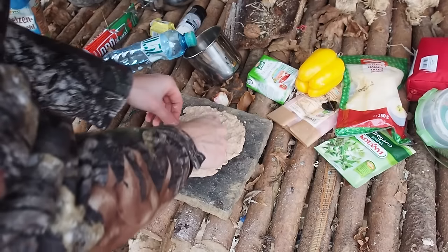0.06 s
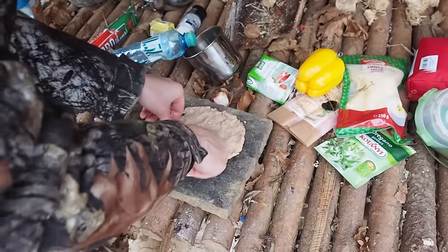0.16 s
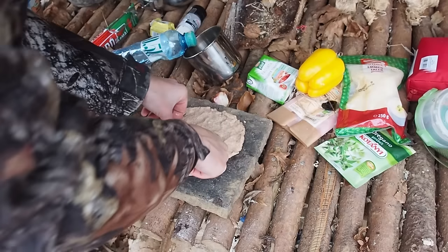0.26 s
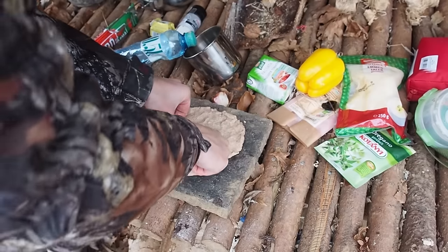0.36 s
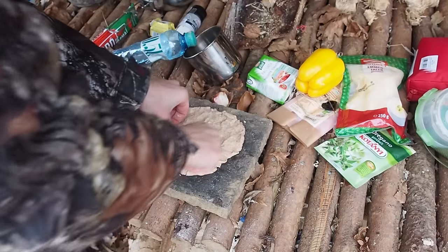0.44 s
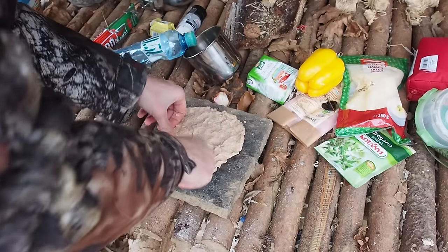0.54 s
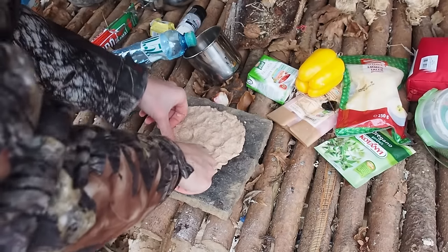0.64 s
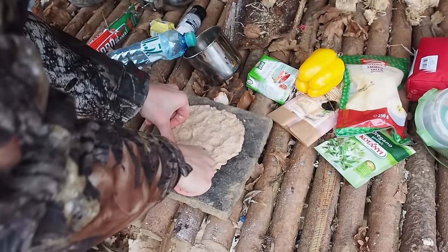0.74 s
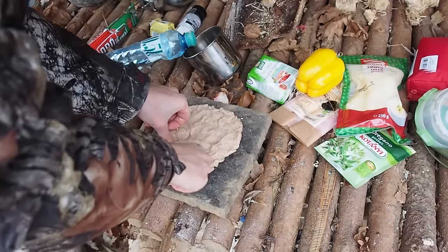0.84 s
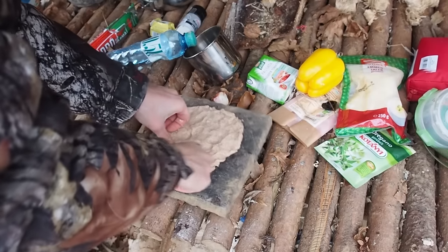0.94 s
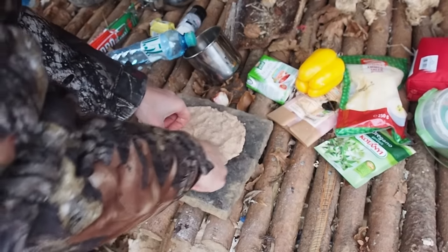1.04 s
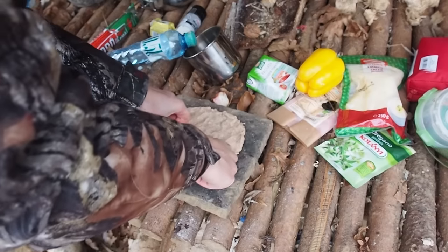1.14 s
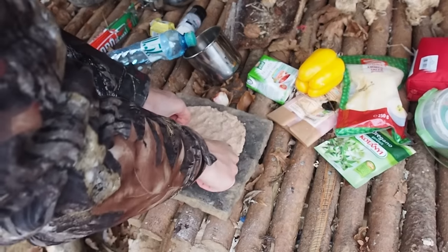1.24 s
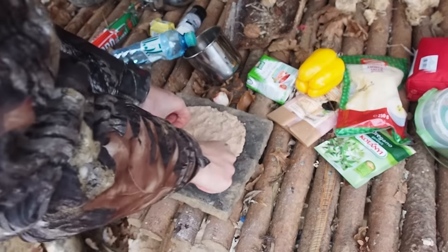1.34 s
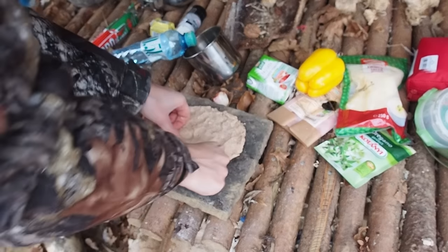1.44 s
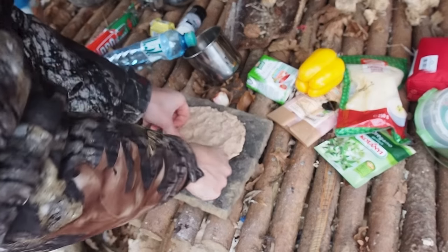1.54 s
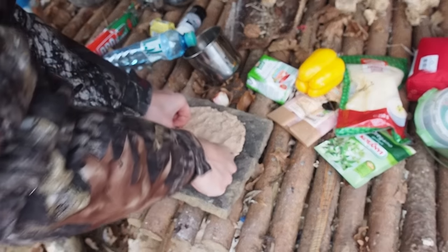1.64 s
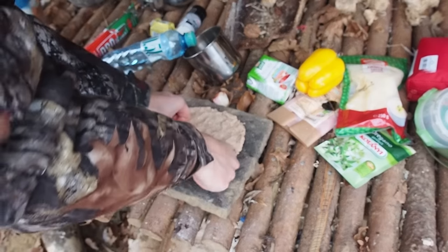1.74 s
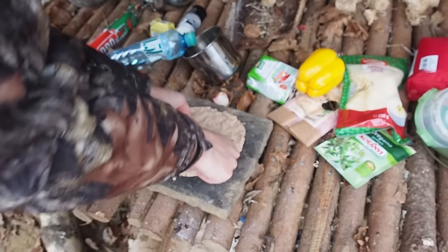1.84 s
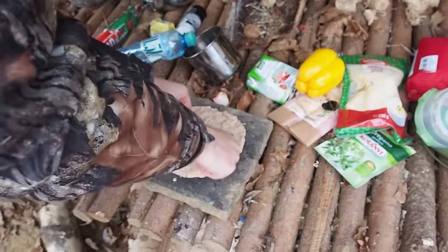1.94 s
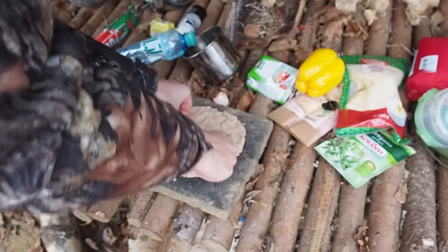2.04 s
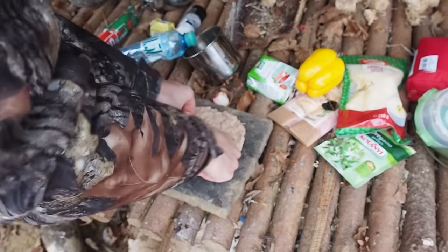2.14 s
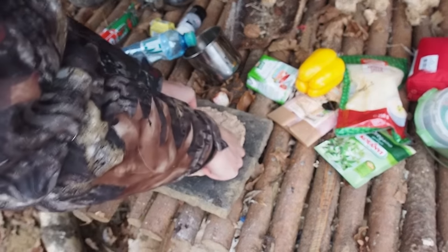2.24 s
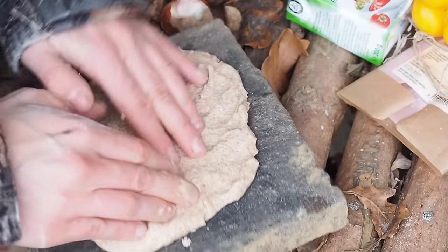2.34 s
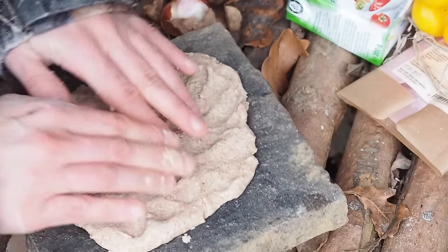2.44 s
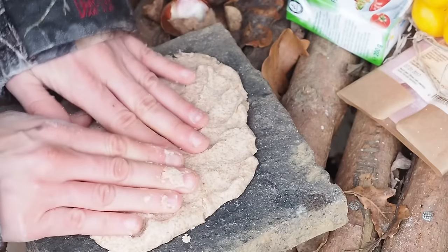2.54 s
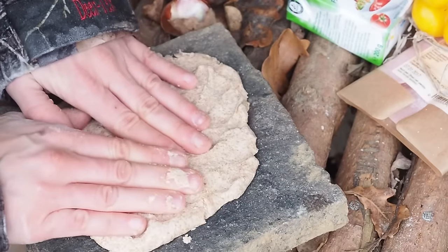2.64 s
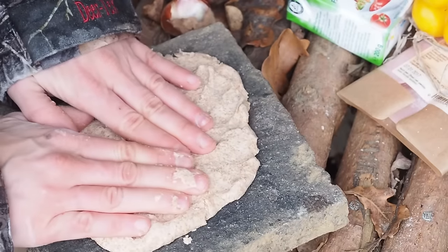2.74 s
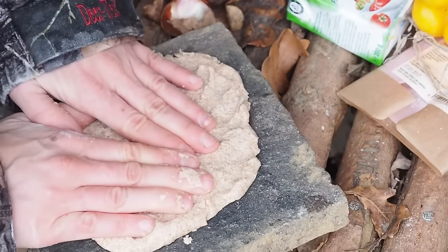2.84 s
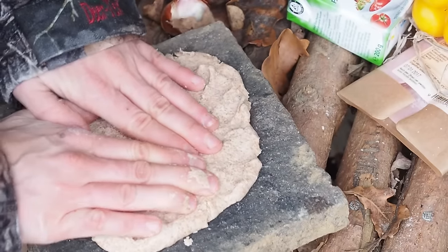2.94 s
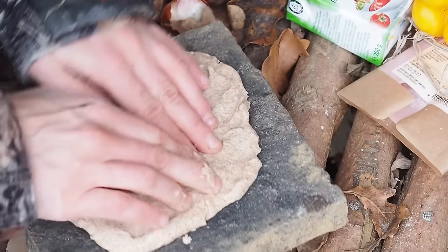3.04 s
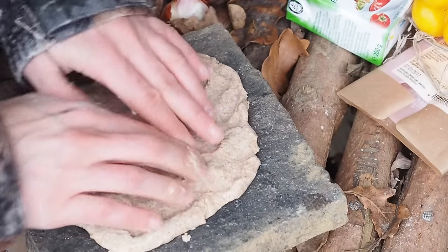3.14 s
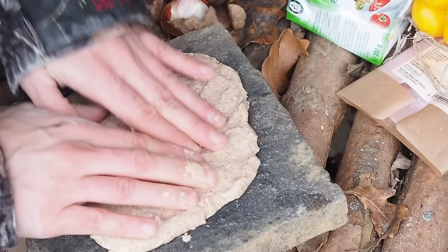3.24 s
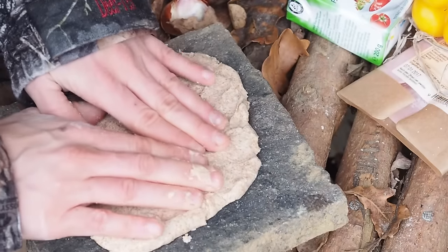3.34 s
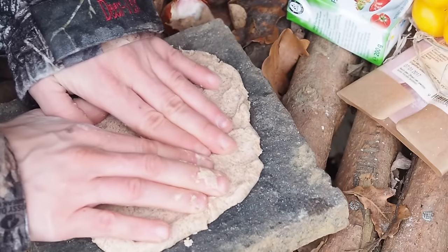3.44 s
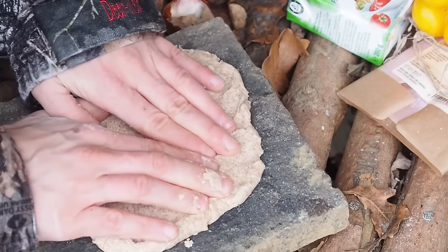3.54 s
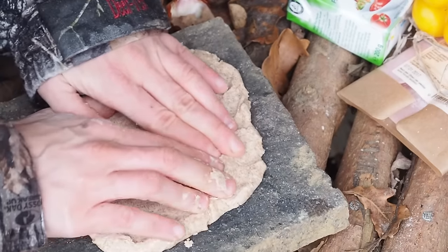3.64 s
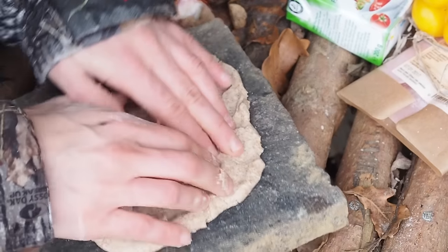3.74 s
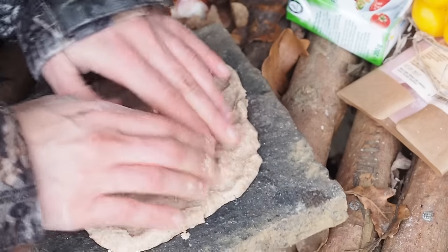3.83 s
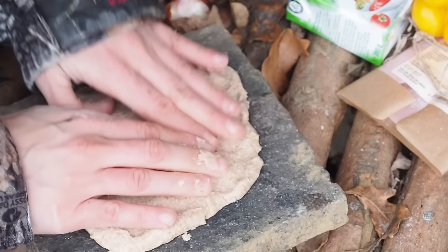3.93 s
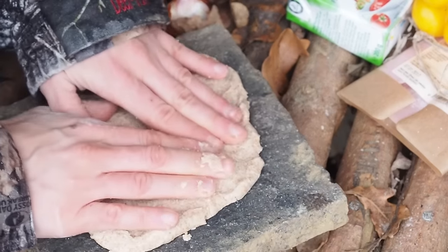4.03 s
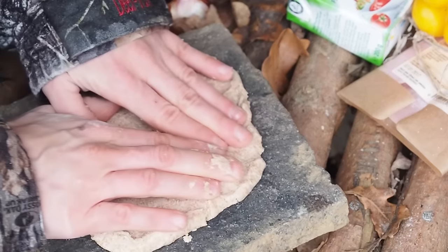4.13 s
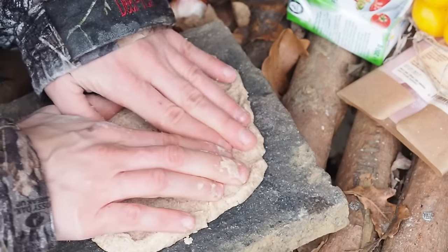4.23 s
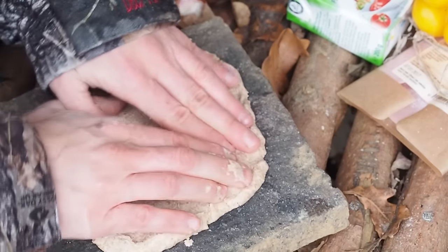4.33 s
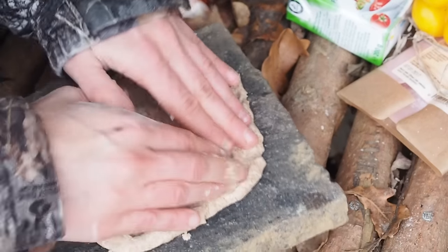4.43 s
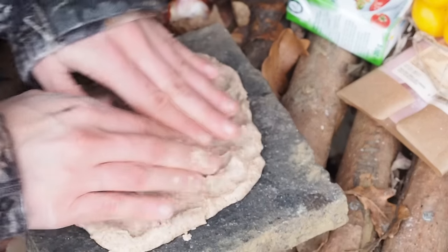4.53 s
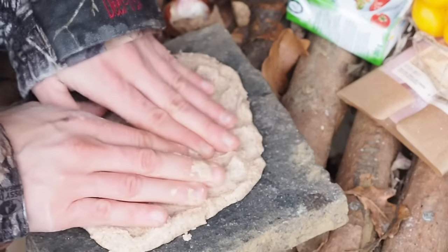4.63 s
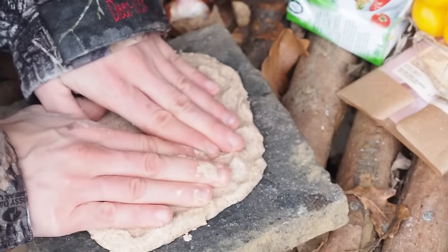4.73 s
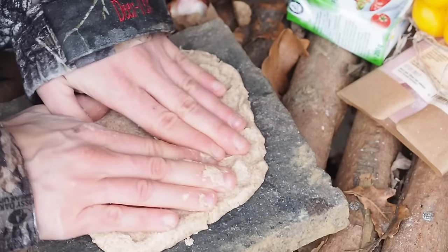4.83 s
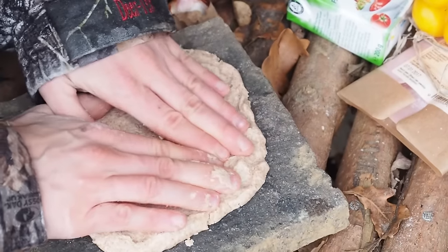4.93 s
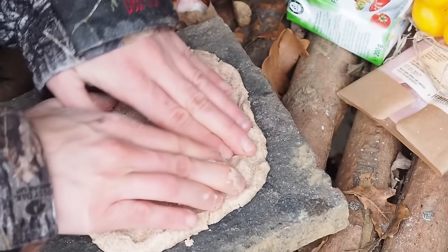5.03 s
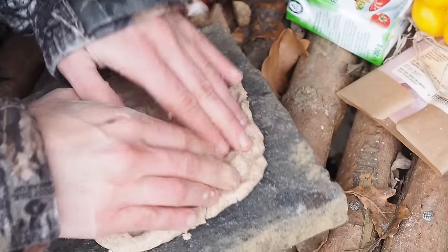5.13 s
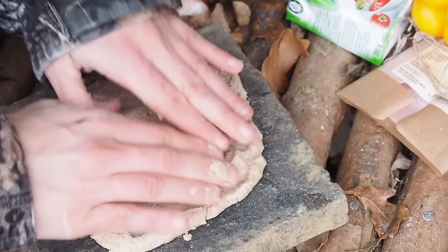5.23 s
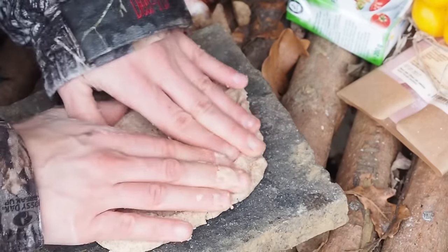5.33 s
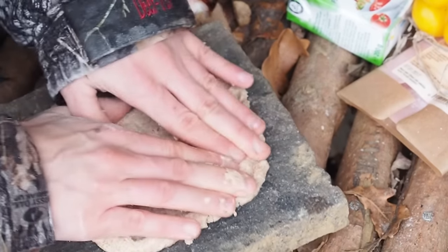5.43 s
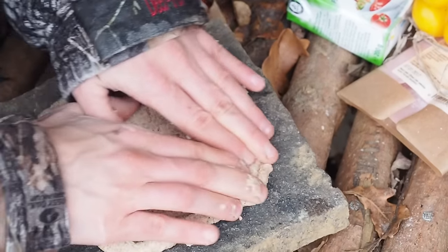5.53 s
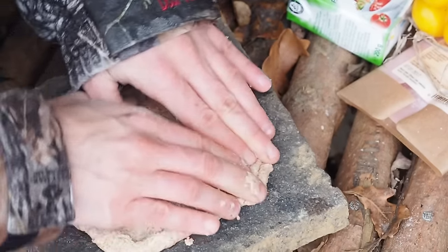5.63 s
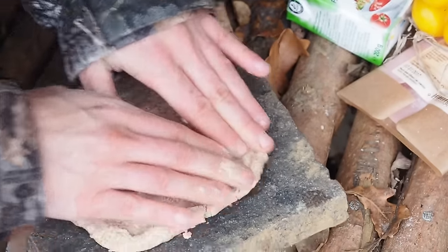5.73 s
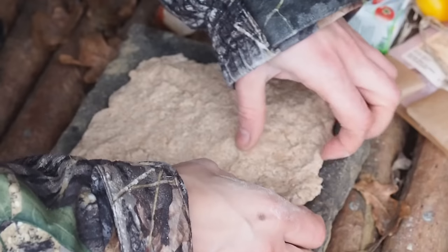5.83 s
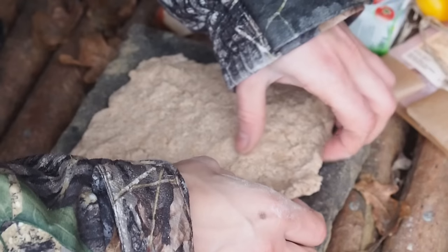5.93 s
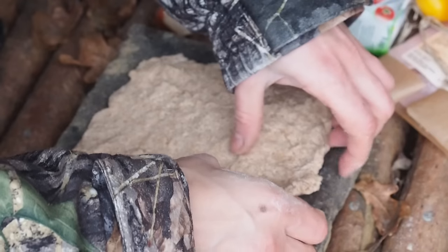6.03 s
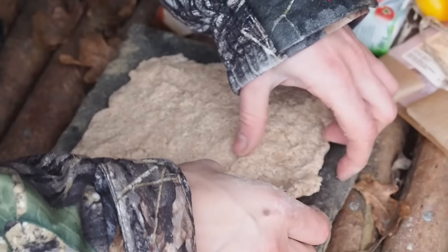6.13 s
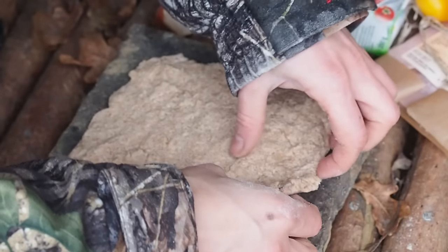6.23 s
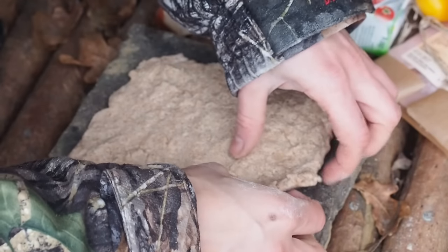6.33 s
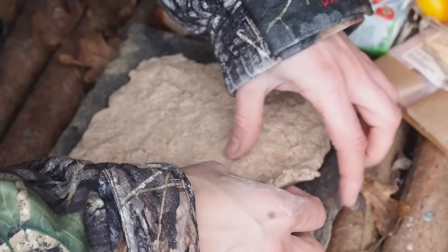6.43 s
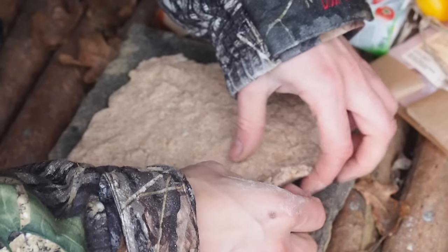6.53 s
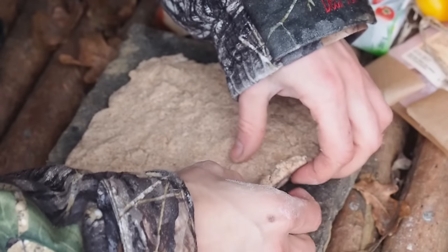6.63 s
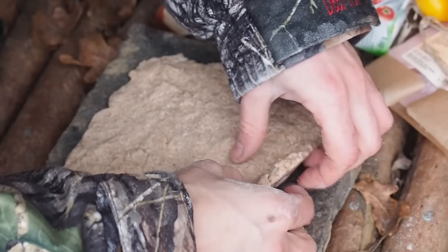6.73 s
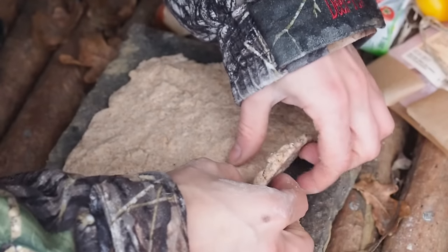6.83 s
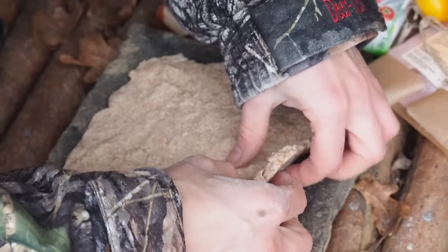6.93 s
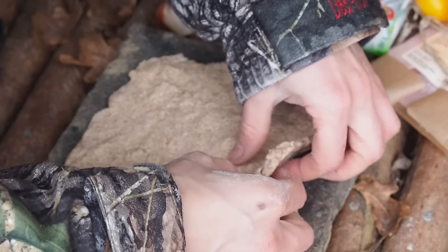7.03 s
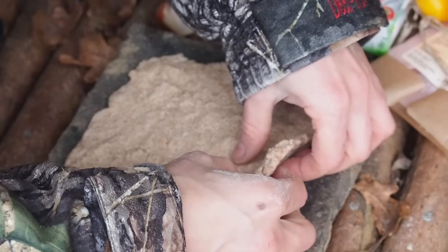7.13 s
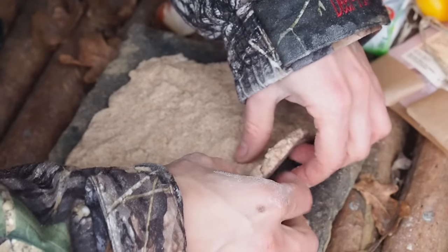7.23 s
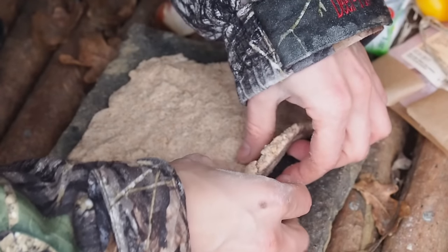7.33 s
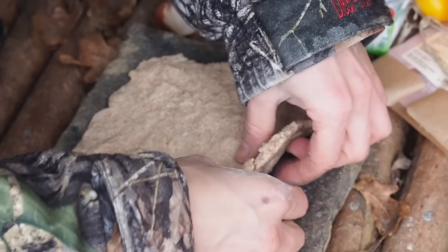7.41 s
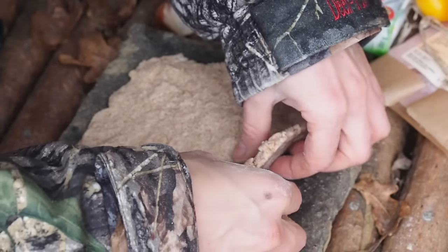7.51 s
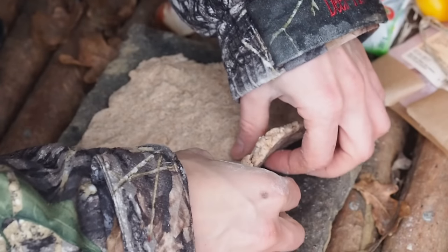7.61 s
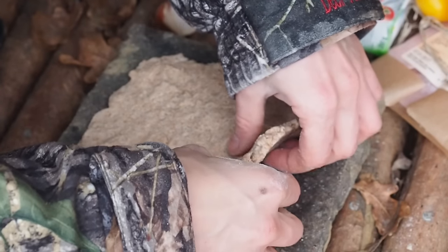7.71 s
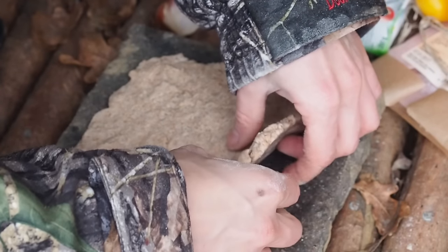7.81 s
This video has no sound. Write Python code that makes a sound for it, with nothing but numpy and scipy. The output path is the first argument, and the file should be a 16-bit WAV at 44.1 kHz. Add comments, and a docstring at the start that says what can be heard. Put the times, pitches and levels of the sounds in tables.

```python
"""An even forest hush and rubbing sleeves open the scene, with a faint knock of stone slab on log.
Then hands pat dough flat on the slab, which lies on a log deck: each stroke swishes the sleeves (shaped noise)
and thumps the slab (damped modes and decaying noise) through the dough; a softer blow often follows.
Stiff folds snap (noise bursts), bare stone clinks and small objects ping (damped modes); the end is quiet cloth.
Loud peaks pull the whole level down and the hush creeps back afterwards."""
import sys
import numpy as np
from scipy import signal
from scipy.fft import rfft, irfft, next_fast_len
from scipy.io import wavfile
from scipy.ndimage import uniform_filter1d, minimum_filter1d, map_coordinates

SR = 44100
rng = np.random.default_rng(int(sys.argv[2]) if len(sys.argv) > 2 else 0)


def file_out(sig):
    """Save sig as 16-bit WAV at sys.argv[1]."""
    # one column per channel
    cols = np.atleast_2d(sig).T
    # limit, then scale
    lim = np.clip(cols, -1, 1)
    pcm = np.round(lim * 32767).astype(np.int16)
    wavfile.write(sys.argv[1], SR, pcm)


N = 347067
HIT = np.arange(SR // 3) / SR  # time within one blow, s
CLOCK = np.arange(N) / SR  # scene time, s


def amp(db):
    """Decibels to linear gain."""
    return 10 ** (np.asarray(db) / 20)


def unit(x):
    """Scale to rms 1."""
    return x / np.sqrt(np.mean(x ** 2) + 1e-20)


def levelled(x, length_s):
    """Scale so that the mid channel has the energy of rms 1 held for length_s."""
    return x * np.sqrt(length_s * SR / np.sum(x.mean(0) ** 2))


def along(points, hz):
    """Interpolate (frequency [Hz], value) points on a log frequency axis."""
    point_hz, value = np.transpose(points)
    return np.interp(np.log(hz + 1), np.log(point_hz + 1), value)


def wobble(rate_hz):
    """Smooth random curve with rate_hz knots a second."""
    knots = rng.standard_normal(int(N * rate_hz / SR) + 4)
    return map_coordinates(knots, [CLOCK * rate_hz])


def filtered(x, response):
    """Zero-phase filter: multiply the spectrum by response(hz)."""
    n = x.shape[-1]
    padded = next_fast_len(n + 8192)
    spectrum = rfft(x, padded) * response(np.fft.rfftfreq(padded, 1 / SR))
    return irfft(spectrum, padded)[..., :n]


def coloured(x, points):
    """Minimum-phase filter through (frequency [Hz], level [dB]) points; attacks stay sharp."""
    size = 2048
    response = amp(along(points, np.fft.rfftfreq(size, 1 / SR)))
    cepstrum = irfft(np.log(response))
    cepstrum[1:size // 2] *= 2  # fold onto positive time
    cepstrum[size // 2 + 1:] = 0
    impulse = irfft(np.exp(rfft(cepstrum)))
    return signal.fftconvolve(x, impulse[None], axes=1)[:, :x.shape[1]]


def noise(alike, size):
    """White stereo noise with a given left-right correlation per frequency."""
    def mid_side_gains(hz):
        angle = np.arccos(np.clip(along(alike, hz), -1, 1)) / 2
        return np.array([np.cos(angle), np.sin(angle)])

    mid, side = filtered(rng.standard_normal((2, size)), mid_side_gains)
    return np.array([mid + side, mid - side])


def dying(alike, decay, size=len(HIT)):
    """Stereo noise in which each band decays at its own t60."""
    hz, t, z = signal.stft(noise(alike, size), SR, nperseg=128)
    fade = amp(-60 * t / along(decay, hz)[:, None])
    return signal.istft(z * fade, SR, nperseg=128)[1][:, :size]


def ring(modes, attack_s):
    """Damped sine modes; strengths scatter about 1 dB at each strike."""
    hz, db, t60 = np.transpose(modes)[:, :, None]
    strength = amp(db + rng.standard_normal(hz.shape) - 60 * HIT / t60)
    sign = (-1) ** np.arange(len(hz))[:, None]
    summed = (sign * strength * np.sin(2 * np.pi * hz * HIT)).sum(0)
    return summed * (1 - np.exp(-HIT / attack_s))


def rattled(sound, length_s, count):
    """Repeat a sound at random small contacts that weaken over length_s."""
    when = rng.uniform(0, length_s, count)
    when = when - when.min()  # first contact comes with the blow
    sizes = rng.choice([-1, 1], count) * np.exp(-when / length_s)
    contacts = np.bincount((when * SR).astype(int), sizes)
    return signal.fftconvolve(sound, contacts[None], axes=1)[:, :len(HIT)]


def panned(x, left_db):
    """Make the left louder than the right by left_db."""
    return x * amp([[left_db / 2], [-left_db / 2]])


def add(track, s, sound):
    """Mix a sound into the track at s seconds."""
    part = track[:, round(s * SR):][:, :sound.shape[-1]]
    part += sound[..., :part.shape[1]]


# hush before distance colouring: (time [s], level [dB])
HUSH = [(0, -47.5), (5.5, -45.5), (7.87, -49)]
# hush spectrum: (frequency [Hz], relative density [dB per Hz])
TREES = [(15, -59), (25, -26), (114, -3.5), (170, -2.5), (200, -3), (270, -4), (335, -6), (416, -12.5),
         (531, -4.5), (575, -10.5), (775, -7.5), (3820, -16.5), (6740, -15.5), (14800, -15), (16000, -21)]
# hush stereo: (frequency [Hz], left-right correlation [-1..1])
TREES_ALIKE = [(60, 1), (130, -0.47), (290, -0.32), (640, 0.74), (3000, 0.27), (15000, -0.063)]
# far hum bands: (centre [Hz], half width at 1/e [Hz], mean level [dB])
DRONE = [(203.6, 4.8, -61), (350, 41, -63.5), (870, 61, -62.5), (1230, 500, -75), (1795, 47, -66)]


def forest():
    """Even hush of trees, dulled by distance, plus narrow noise bands as a faint wavering hum."""
    level_db = np.interp(CLOCK, *np.transpose(HUSH)) + 0.077 * wobble(4.5)
    air = unit(coloured(noise(TREES_ALIKE, N), TREES + [(20000, -65)]))
    air = coloured(air, [(2000, 3.0), (6000, -1.5)])  # distance dulls the leaves
    hum = np.zeros(N)
    for centre_hz, width_hz, db in DRONE:
        band = filtered(rng.standard_normal(N), lambda hz: np.exp(-((hz - centre_hz) / width_hz) ** 2))
        hum += amp(db + 2.6 * wobble(4)) * unit(band)
    return amp(level_db) * air + hum


# cloth stereo: (frequency [Hz], left-right correlation [-1..1])
CLOTH_ALIKE = [(300, 0.91), (1400, 0.97), (3100, 0.88), (6800, 0.4), (15000, 0.15)]


def cloth(spectrum, grain_db, grain_rate_hz, clump_db):
    """Threads slipping: grainy hiss in clumps, its colour shifting as the folds move."""
    grains = amp(grain_db * wobble(grain_rate_hz) + clump_db * wobble(140))
    z = signal.stft(noise(CLOTH_ALIKE, N) * grains, nperseg=256)[2]
    folds = uniform_filter1d(rng.standard_normal(z.shape[1:]), size=4, axis=0)
    folds = uniform_filter1d(folds, size=9, axis=1)
    shifting = signal.istft(z * amp(2.2 * unit(folds)), nperseg=256)[1][:, :N]
    return unit(coloured(shifting, spectrum))


# sleeve rubbing: (time [s], mean level [dB])
RUBBING = [(0, -42), (.9, -42), (1.3, -45.5), (1.95, -42), (2.3, -45), (3.6, -45), (5.6, -42), (6.0, -54),
           (6.5, -48.5), (7.87, -47)]
# rubbing spectrum: (frequency [Hz], relative density [dB per Hz])
CLOTH = [(180, -18), (300, -21), (455, 10), (537, 0.5), (915, 7.5), (2700, 3), (7570, 5), (9550, 2.5),
         (13100, 0), (16000, -0.5)]


def rustle():
    """Sleeves rub while the hands press and shift: continuous cloth hiss at a drifting level."""
    level_db = np.interp(CLOCK, *np.transpose(RUBBING)) + 0.43 * wobble(17)
    hiss = cloth(CLOTH, grain_db=1.5, grain_rate_hz=460, clump_db=1.0)
    return panned(amp(level_db) * hiss, left_db=2.5)


# slab knocking on a log: (time [s], relative level [dB], brightness [dB])
KNOCKS = [(.018, -29.5, 5), (.793, -22.5, 0), (.811, -7.5, 0.5), (.823, -7.5, 4), (.853, -24, 1),
          (1.0135, -1.5, -6), (1.020, -16, -10), (2.456, -23, -14), (5.792, -24.5, 11)]
# log modes: (frequency [Hz], relative level [dB], t60 [s])
LOG = [(614, 10, 0.061), (789, 12.5, 0.12), (835, 9, 0.037), (958, 6, 0.14), (1239, 0.5, 0.06),
       (1426, -3.5, 0.1), (1725, 6, 0.023), (2194, 8.5, 0.04), (2320, -20, 0.1), (2330, -8, 0.14),
       (2700, -23, 0.059)]
# slab and deck stereo: (frequency [Hz], left-right correlation [-1..1])
SLAB_ALIKE = [(60, 0.74), (250, 0.88), (1000, 0.91), (6000, 0.85)]
# deck noise decay: (frequency [Hz], t60 [s])
THUD_DECAY = [(100, 0.53), (500, 0.13), (2000, 0.11), (10000, 0.27)]


def knocks():
    """Slab meets log without dough: damped log modes plus decaying deck noise, a hollow gritty clack."""
    out = np.zeros((2, N))
    deck_colour = [(50, -16.0), (110, -4.5), (300, -7.5), (700, 1), (4000, -20.5), (12000, -30)]
    for s, db, brightness_db in KNOCKS:
        tilt = [(900, 0), (2200, brightness_db)]
        wood = levelled(coloured(ring(LOG, attack_s=0.00036)[None], tilt), 0.016)
        deck = levelled(coloured(dying(SLAB_ALIKE, THUD_DECAY), deck_colour), 0.024)
        add(out, s, amp(db - 12.5) * (wood + amp(-12) * deck))
    return out


def crumbs(rate_hz):
    """Sparse tiny ticks of floury skin and cloth: short damped sines at random pitches, rms 1."""
    count = int(rate_hz * N / SR)
    when, pitch, size = rng.uniform(1e-3, 1, (count, 3)).T[:, :, None]
    hz = 1800 * 6 ** pitch
    t = HIT[:SR // 400]
    ticks = -np.log(size) * np.sin(2 * np.pi * hz * t) * np.exp(-hz * t)
    index = (when * N).astype(int) + np.arange(len(t))
    return unit(np.bincount(index.ravel(), ticks.ravel(), N)[:N])


def swell(s, rise_s, fall_s, shape):
    """Arm speed curve peaking at s; shape 1 is pointed, 2 is rounded."""
    t = CLOCK - s
    return np.exp(-np.abs(t / np.where(t < 0, rise_s, fall_s)) ** shape)


# hand blows: (time [s], relative level [dB], bass [dB], chatter against thump [dB],
#              sleeve swish level [dB], swing length [s])
PATS = [(0.301, -18, 4, -13, -39, 0.013), (0.694, -32.5, 4, 1, -45, 0.02), (0.926, -5, 0, -17, -40, 0.0081),
        (1.011, 1.5, -10, -14, -21.5, 0.0023), (1.125, -11, 4, -15, -35, 0.0051),
        (1.283, -22.5, 16, -7, -34.5, 0.027), (1.917, -20, 19, -7, -25, 0.016),
        (1.955, -34, -1, -18, -41, .01), (2.188, -6.5, 4, -15, -33.5, 0.04),
        (2.403, -3.5, 6, -8.5, -17.5, 0.019), (2.485, -11, 13.5, -13, -30, 0.0073),
        (3.12, -8, 8.5, -9, -20, .023), (3.829, -3, 2.5, -9.5, -17, 0.024),
        (3.913, -10.5, 9, -16, -36, .006), (4.488, -3, 2, -9, -17.5, 0.023),
        (4.564, -11, 10, -20, -30, 0.0023), (5.183, -2, 0, -11.5, -19, 0.027),
        (5.265, -9.5, 10, -18.5, -30.5, 0.0034), (5.517, -28, 12, -1, -36, 0.027),
        (5.664, -26, 2, -3, -37, 0.011), (5.735, -0.5, 0, -9, -20, 0.024)]
# hands lifting and shifting: (time of peak speed [s], level [dB], half length [s])
SHIFTS = [(.12, -39, 0.047), (0.814, -35.5, .025), (1.544, -42, 0.053), (2.766, -44.5, 0.13),
          (3.004, -33, 0.022), (3.485, -34, 0.035), (4.177, -34, 0.038), (4.303, -36, 0.038),
          (4.861, -33, 0.052), (5.491, -35, 0.027), (7.72, -56, 0.031)]
# swish spectrum: (frequency [Hz], relative density [dB per Hz])
SWISH = [(150, -27), (600, -4), (1500, -2.5), (3000, 1), (4500, 2.5), (8000, 5), (11000, -1.5), (16000, -2)]
SWISH_LEAD_S, SWISH_FALL_S = 0.0023, 0.014  # arm is fastest just before landing
STROKE_SHAPE, SHIFT_SHAPE = 1.22, 1.4


def swings():
    """Sleeve hiss follows arm speed and dies on landing; capped crackle makes slow rubs crumbly."""
    speed = np.zeros(N)
    for s, *_, swish_db, swing_s in PATS:
        speed += amp(swish_db) * swell(s - SWISH_LEAD_S, swing_s, SWISH_FALL_S, STROKE_SHAPE)
    for s, db, half_s in SHIFTS:
        speed += amp(db) * swell(s, half_s, half_s, SHIFT_SHAPE)
    swish = cloth(SWISH, grain_db=2.2, grain_rate_hz=1500, clump_db=1.9)
    crackle = np.minimum(.5 * speed, amp(-35)) * crumbs(rate_hz=220)
    return speed * swish + crackle


SMALL_SNAP_DB, SMALL_SNAP_SCATTER_DB = 9.5, 3.5  # offset from the shift level, random spread


def small_snaps(count):
    """Each hand shift flips count small folds at random; rows as in SNAPS."""
    rows = []
    chance = rng.standard_normal((len(SHIFTS), count, 3))
    for (s, db, half_s), folds in zip(SHIFTS, chance):
        for when, size, tilt in folds:
            level_db = db + SMALL_SNAP_DB + SMALL_SNAP_SCATTER_DB * size
            rows.append((abs(s + half_s * when), level_db, 2 * tilt))
    return rows


# sleeve folds snapping at set times, loud and faint: (time [s], relative level [dB], brightness [dB])
SNAPS = [(0.5106, -15, 5), (0.6742, -17, -2.5), (1.2592, -15.5, 1), (1.7813, -22, 5), (1.9047, -9.5, 4.5),
         (2.3565, -15, -1), (2.3825, -13, -1), (2.4855, -13, 11), (2.5147, -16.5, 0), (2.6988, -17.5, -4),
         (2.8704, -21.5, -1), (3.0008, -24, -4), (3.1037, -8, 4), (3.201, -23.5, 5), (3.4441, -18, 3),
         (3.4866, -7.5, 0.5), (3.5183, -12.5, 3), (3.5451, -6, 5), (3.5663, -13, 5), (3.7785, -9, 1.5),
         (3.811, -18, -4), (3.9723, 1.5, -3), (4.2243, -17, 2), (4.2595, -9, 1.5), (4.2851, -13.5, -3),
         (4.3441, -15, 6), (4.4553, -16.5, 2), (4.6157, -6.5, 3), (4.6788, -4.5, 5), (4.8486, -14, 2),
         (4.8709, -4, 9.5), (4.9031, -7, 0.5), (4.9709, -3, -2.5), (5.0798, -15.5, 12), (5.3418, -20, 4),
         (5.4705, -15, -2), (5.5072, -8, 15), (5.5561, -8.5, 0), (5.576, -12, -8), (5.7113, -4, 0.5),
         (6.209, -28, 7), (6.9089, -16, 5.5), (7.6728, -26, -1)]
# crack spectrum: (frequency [Hz], relative density [dB per Hz])
SNAP = [(100, -16), (400, -11.5), (900, -9.5), (2000, -4.5), (3200, -4.5), (5000, -2.5), (8000, 1),
        (12000, -2.5), (16000, -8.5)]
# scattered tail: (frequency [Hz], t60 [s])
SNAP_TAIL = [(300, 0.076), (2000, 0.059), (6000, 0.063), (14000, 0.063)]
FOLD_BODY_DB, FOLD_SHEEN_DB = 2, -2.5  # low and high end; brightness tilts one against the other


def snaps():
    """A stiff fold flips: noise burst, its reflection off the slab and a short scattered tail."""
    out = np.zeros((2, N))
    t = HIT[:SR // 14]
    for s, db, brightness_db in list(SNAPS) + small_snaps(count=5):
        late = t - rng.uniform(.002, .0033)  # time since the reflection, s
        reflection = (late > 0) * np.exp(-np.abs(late) / .0009)
        shape = np.exp(-t / .0008) + amp(-8) * reflection
        tail = amp(-14) * dying(CLOTH_ALIKE, SNAP_TAIL, size=len(t))
        crack = coloured(noise(CLOTH_ALIKE, len(t)) * shape + tail, SNAP)
        fold = [(1500, FOLD_BODY_DB - brightness_db), (5000, 0), (12000, FOLD_SHEEN_DB + brightness_db)]
        add(out, s, amp(db - 12.5) * levelled(coloured(crack, fold), 0.0045))
    return panned(out, left_db=4.5)


# slab modes on the logs: (frequency [Hz], relative level [dB], t60 [s])
SLAB = [(177.5, -6, 0.097), (246, 3, 0.069), (304.6, 4.5, 0.039), (346.4, 2, 0.047), (445.8, 3, 0.1),
        (536, 1, 0.037), (610, -7, 0.083), (696, -13, 0.15), (791, -13.5, 0.12), (937, -12, 0.1),
        (1025, -28, 0.1), (1173, -4, 0.056), (1421, -5.5, 0.024), (1475, -5, 0.059), (1604, -5, 0.036),
        (1676, -21, 0.045), (1864, -24, 0.09), (2134, -11, 0.06), (2240, -31, 0.059), (3000, -44, 0.03)]
# deck noise spectrum: (frequency [Hz], relative density [dB per Hz])
THUD = [(30, -38), (70, -17.5), (170, 0), (300, 1), (600, 0.5), (1000, -7.5), (2000, -8.5), (3000, -25.5),
        (8000, -46), (16000, -99)]


def slab():
    """One slab blow: its damped modes plus decaying noise for the many deck resonances."""
    shudder = unit(coloured(dying(SLAB_ALIKE, THUD_DECAY), THUD))
    return unit(ring(SLAB, attack_s=.0006)) + amp(-7) * shudder


# soft push through the dough: (frequency [Hz], gain [dB])
PALM = [(450, -2), (800, 3.5), (1400, -7), (2500, -18.5)]
# hard little contacts after it: (frequency [Hz], gain [dB])
CHATTER = [(200, -39), (500, -9), (900, -6), (1500, -5), (5000, 10.5)]
SLAB_HOLD_S = 0.085  # resting hand smothers the ring
DULL_SLOPE = 0.59  # treble loss of softer blows, dB per dB


def pats():
    """The palm drives the low slab modes through dough; repeated contacts make the slab chatter."""
    out = np.zeros((2, N))
    smother = np.exp(-(HIT / SLAB_HOLD_S) ** 3)
    for s, db, bass_db, chatter_db, _, _ in PATS:
        hand = [(170, bass_db), (450, 0), (1500, DULL_SLOPE * min(db, 0))]
        thump = levelled(coloured(coloured(slab(), hand), PALM), 0.01)
        contacts = rattled(slab(), length_s=.028, count=9)
        chatter = levelled(coloured(contacts, CHATTER), 0.023)
        blow = amp(db - 9) * levelled(smother * (thump + amp(chatter_db) * chatter), 0.024)
        add(out, s, blow)
        add(out, s + rng.uniform(.024, .036), amp(-15.5) * blow)  # slab rebounds once
    return panned(out, left_db=-1.7)


# slab rocking and clinking on the logs: (time [s], relative level [dB])
CLINKS = [(0.811, -34), (0.9424, -13), (1.1463, -21), (2.203, -12.5), (2.42, -13), (5.196, -17)]
# bare stone modes: (frequency [Hz], relative level [dB], t60 [s])
STONE = [(1905, -2.5, 0.14), (2820, 1.5, 0.1), (3300, -5.5, 0.17), (3720, 0, 0.15), (4500, 3.5, 0.084),
         (4790, -5.5, 0.13), (5450, -39, 0.053), (6120, 5.5, 0.076), (7600, 6.5, 0.066), (8650, -16, 0.17)]


def clinks():
    """Jolted bare stone: high damped modes, struck separately per side, plus gritty decaying noise."""
    out = np.zeros((2, N))
    for s, db in CLINKS:
        sides = np.array([ring(STONE, attack_s=0.0014) for side in range(2)])
        grit = coloured(dying(CLOTH_ALIKE, SNAP_TAIL), SNAP)
        add(out, s, amp(db - 14.0) * levelled(unit(sides) + unit(grit), 0.017))
    return out


# something small and hard nearby is jogged: (time [s], relative level [dB])
PINGS = [(2.425, -15.5), (2.522, -27.5), (2.567, -31.5), (3.165, -27.5), (3.299, -29), (5.21, -22.5)]
# its modes: (frequency [Hz], relative level [dB], t60 [s])
PING = [(1510, 0, .1), (2235, 7.5, 0.093), (2220, -16.5, 0.27)]
# thin ring left by the hardest punch: (frequency [Hz], relative level [dB], t60 [s])
LINGER = [(680, -3, 1), (1990, -2, .35)]


def pings():
    """Faint thin rings of a few damped modes after the heavier blows."""
    out = np.zeros((2, N))
    for s, db in PINGS:
        add(out, s, amp(db - 11.5) * ring(PING, attack_s=0.00065))
    add(out, 1.014, amp(-32) * ring(LINGER, attack_s=.003))
    return out


def scene():
    """Sum of trees, sleeves, slab, hands and small objects in the open air."""
    return forest() + rustle() + knocks() + swings() + snaps() + pats() + clinks() + pings()


DUCK_ABOVE_DB, DUCK_SHARE, RECOVER_DB_PER_S = -13.5, 0.29, 10  # threshold, share of excess cut, release


def gain_control(x):
    """Gain drops within milliseconds on a loud peak and climbs back at a steady dB rate."""
    peak_db = 20 * np.log10(np.abs(x).max(0) + 1e-9)
    excess_db = np.maximum(peak_db - DUCK_ABOVE_DB, 0)
    needed_db = minimum_filter1d(-DUCK_SHARE * excess_db, size=128)
    climb_db = RECOVER_DB_PER_S * CLOCK
    gain_db = np.minimum.accumulate(needed_db - climb_db) + climb_db
    return x * amp(uniform_filter1d(gain_db, size=128))


TOP_HZ = 15900  # band limit


def record(dry):
    """Ride the gain, round off the highest peaks, then low-pass steeply at TOP_HZ."""
    held = gain_control(dry)
    rounded = held / (1 + np.abs(held / .8) ** 6) ** (1 / 6)
    return filtered(rounded, lambda hz: 1 / (1 + (hz / TOP_HZ) ** 200))


dry = scene()
out = record(dry)
file_out(out)
```